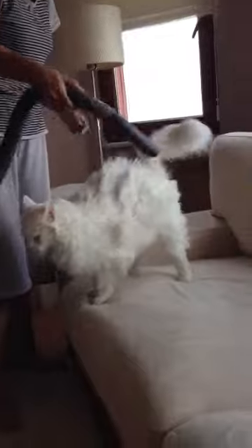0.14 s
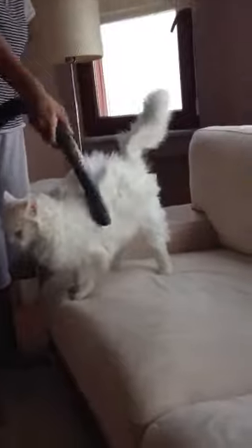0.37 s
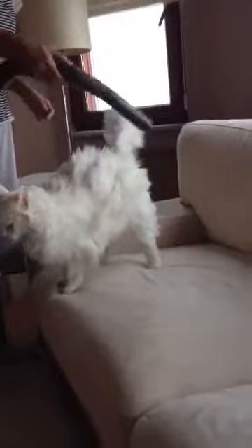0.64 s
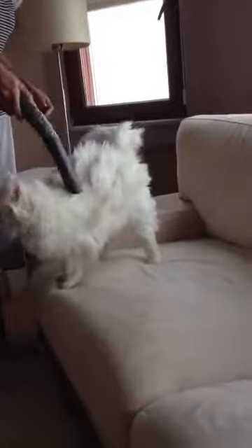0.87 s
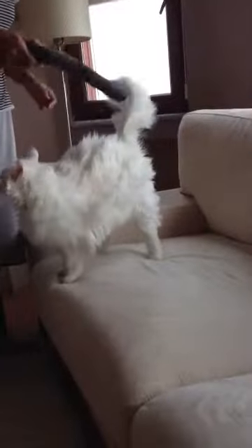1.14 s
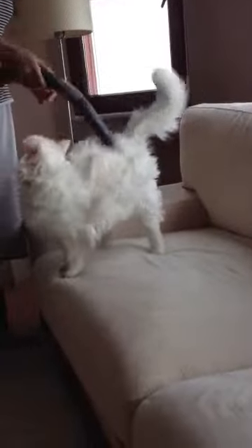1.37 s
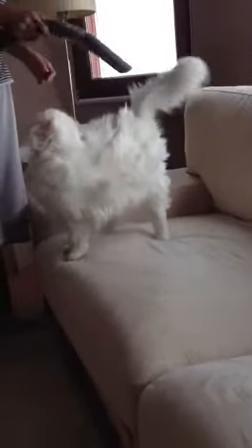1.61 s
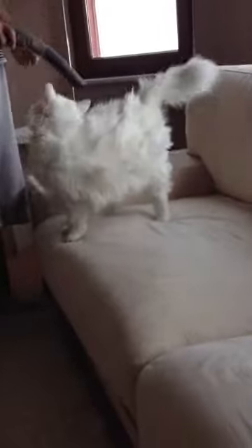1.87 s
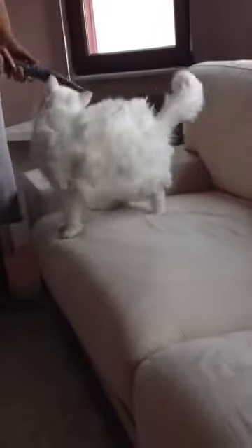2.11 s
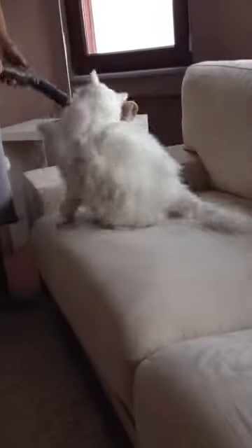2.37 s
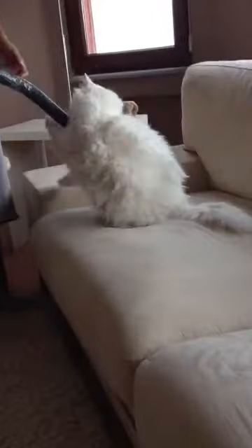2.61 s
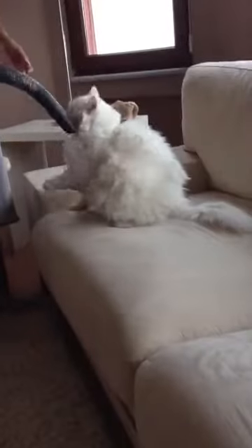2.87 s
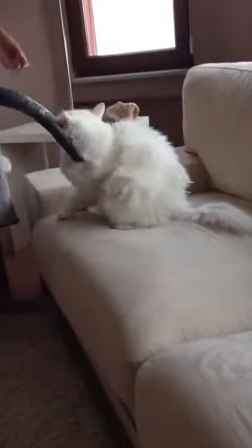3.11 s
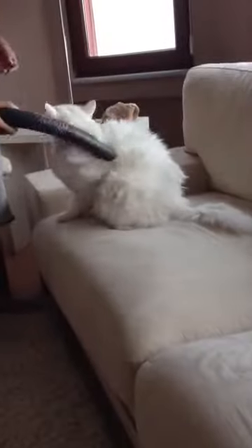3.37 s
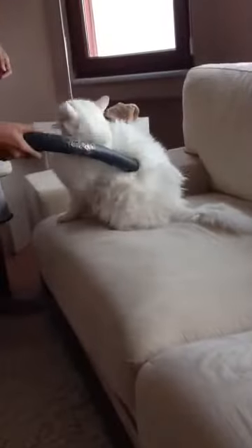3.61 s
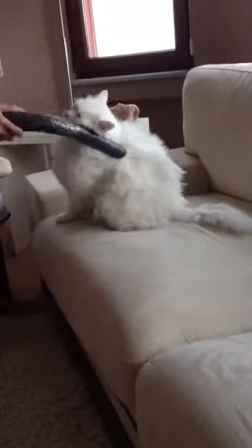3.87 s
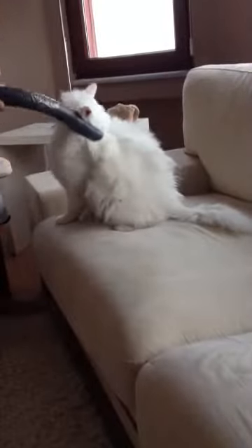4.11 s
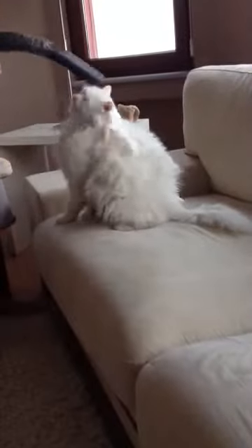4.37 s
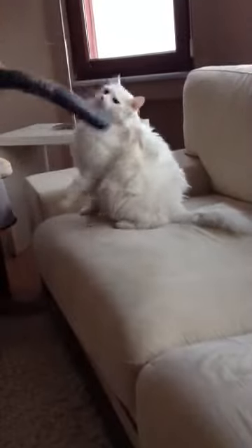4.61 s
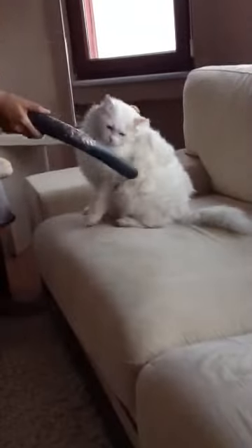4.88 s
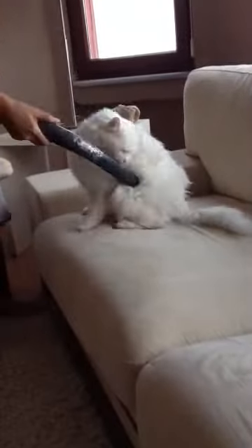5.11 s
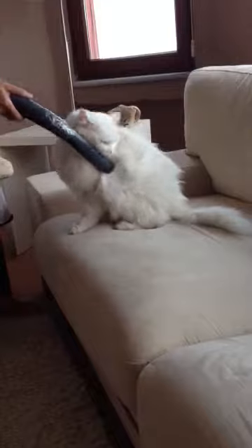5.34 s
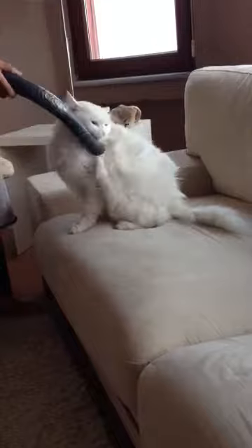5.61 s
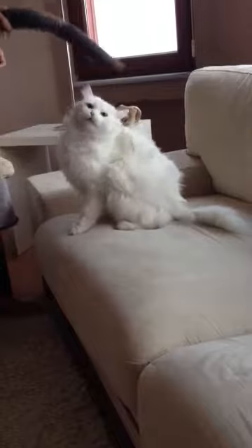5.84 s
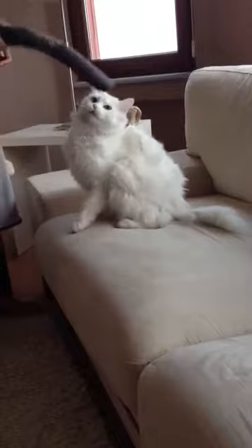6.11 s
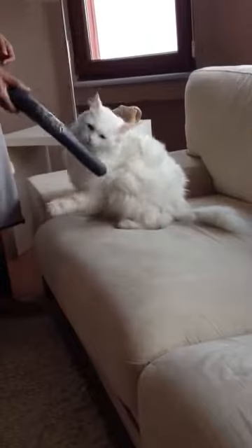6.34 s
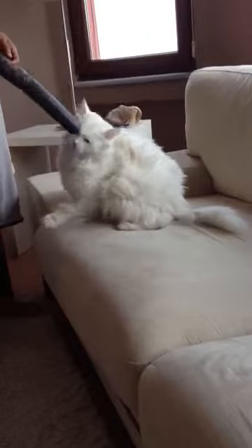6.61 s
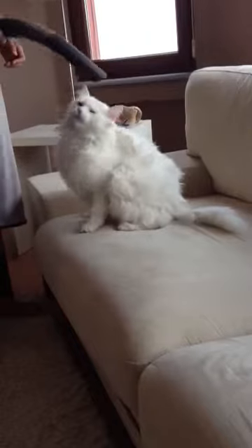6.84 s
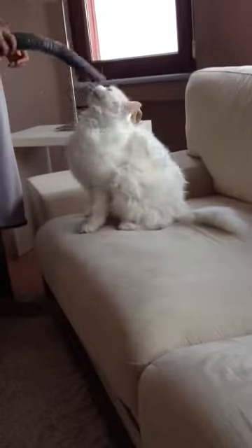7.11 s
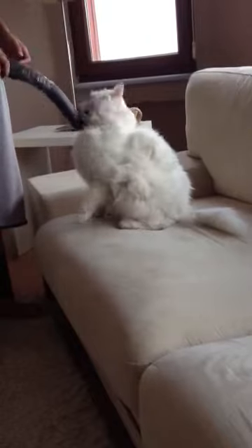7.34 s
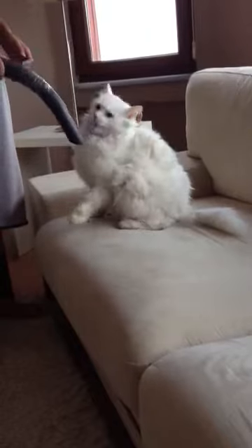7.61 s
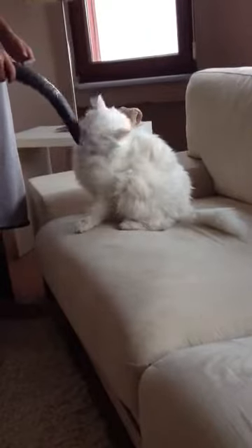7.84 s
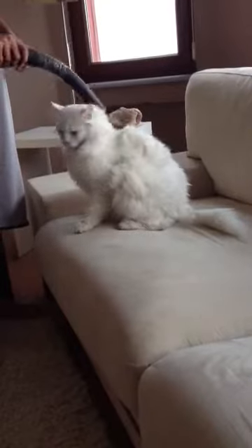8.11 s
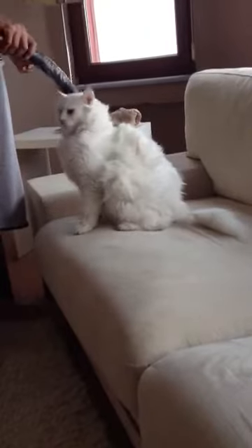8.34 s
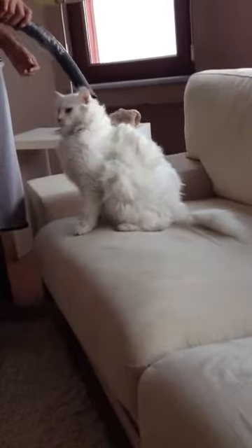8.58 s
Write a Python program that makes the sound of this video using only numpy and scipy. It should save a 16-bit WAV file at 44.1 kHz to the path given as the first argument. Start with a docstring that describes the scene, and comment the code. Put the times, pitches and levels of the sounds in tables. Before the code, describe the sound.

Constant rushing vacuum noise with a clean motor tone and piercing whine that climb and sink slightly, with brief fur flutters and soft thuds.

```python
"""A vacuum cleaner runs in a furnished living room while its hose is drawn over a cat's fur.
Throughout, the motor whines at its shaft speed and at the rate of nine fan blades, over rumbling, roaring, hissing air.
A thud comes at 0.5 s and fur flaps at 0.8 and 1 s; both pitches climb a little as fur chokes the nozzle.
They climb furthest from 3.6 to 4.4 s and from 5.2 to 5.8 s, with flaps at 3.9 and 5.7 s and thuds near 5.8 s.
The pitches then sink back, with a last thud at 7.7 s. One microphone, thin in the bass, hears it all."""
import sys
import numpy as np
from scipy import signal
from scipy.fft import rfft, irfft, next_fast_len
from scipy.io import wavfile
from scipy.ndimage import uniform_filter1d

SR = 44100
rng = np.random.default_rng(int(sys.argv[2]) if len(sys.argv) > 2 else 0)


def waveform_to_disk(signal):
    """Save audio, clipped to [-1, 1], as 16-bit WAV at the path in sys.argv[1]."""
    frames = np.transpose(np.atleast_2d(signal))
    scaled = np.clip(frames, -1, 1) * 32767
    samples = np.round(scaled).astype(np.int16)
    wavfile.write(sys.argv[1], SR, samples)


def attenuation_scalar(level_db):
    """Turn a level in dB into a linear amplitude multiplier (20 dB per decade)."""
    decades = np.asarray(level_db, float) / 20
    return 10 ** decades


N = 384552  # length in samples
FULL_CHOKE_HZ = 25  # rise in shaft speed that counts as a fully choked nozzle


def rms_one(x):
    """Scale to an rms (average strength) of one."""
    return x / np.sqrt(np.mean(x ** 2) + 1e-20)


def drift(rate_hz):
    """Slow chance: noise at every 40th sample, smoothed twice by a one-pole low-pass; spread 1."""
    pole = np.exp(-80 * np.pi * rate_hz / SR)
    noise = rng.standard_normal(N // 40 + 2002)
    slow = signal.lfilter([1], [1, -2 * pole, pole * pole], noise)[2000:]  # skip the filter's start
    return np.interp(np.arange(N) / 40, np.arange(len(slow)), rms_one(slow))


def turns(hz):
    """Phase in radians of a pitch curve."""
    return 2 * np.pi * np.cumsum(hz) / SR


def lag(x, seconds):
    """First-order sluggishness: the output closes in on the input at a steady rate per unit of gap."""
    pole = np.exp(-1 / (seconds * SR))
    return signal.lfilter([1 - pole], [1, -pole], x)


def spans(rows, heights):
    """Steps that hold a height from each start for its length."""
    t = np.arange(N) / SR
    return sum(height * ((t >= start) & (t < start + length))
               for (start, length, _), height in zip(rows, heights))


def half_sine_swell(t, start, length):
    """A rounded rise and fall, silent outside its length."""
    return np.sin(np.pi * np.clip((t - start) / length, 0, 1))


def reach(table, shaft_hz, choked):
    """Room paths add or cancel as the pitch slides: a tone's height, between its choked and open values."""
    hz, choked_db, open_db = np.transpose(table)
    choked_height = np.interp(shaft_hz, hz, attenuation_scalar(choked_db))
    open_height = np.interp(shaft_hz, hz, attenuation_scalar(open_db))
    return choked * choked_height + (1 - choked) * open_height


def choking(hose_lag_s=.035, rotor_lag_s=.415):
    """Fur chokes the nozzle and unloads the fan; the rotor's inertia rounds every change of speed."""
    # spells of choking: (start [s], length [s], rise the shaft would settle at [Hz])
    chokes = [(0, .08, 14), (.455, .11, 3), (.995, .06, 9.6), (1.405, .06, 11.9), (3.585, .36, 25.8),
              (3.985, .4, 25.8), (5.185, .6, 29.7), (6.925, 1.36, 1.5), (8.295, .6, 4.8)]
    unload_hz = lag(spans(chokes, np.array(chokes)[:, 2]), hose_lag_s)
    choked = np.clip(unload_hz / FULL_CHOKE_HZ, 0, 1)
    return choked, lag(unload_hz, rotor_lag_s)


def motor(shaft, shaft_hz, choked, waver_db=1.5, room_late_s=0.039, mains_ripple_hz=100):
    """Rotor unbalance as a clean tone, with weak mains tones and side tones."""
    # magnetic pull at twice mains, alone and beating with the shaft, and a shaft overtone:
    # (shaft multiple, ripple multiple, level [dB rms])
    motor_tones = [(0, 1, -63.5), (0, 2, -57), (0, 3, -57), (1, -1, -62), (1, 2, -63), (2, -1, -66),
                   (2, 0, -63), (2, 1, -61), (2, 2, -64)]
    # height of the shaft tone: (shaft speed [Hz], nozzle choked [dB rms], nozzle open [dB rms])
    shaft_reach = [(564.7, -37, -36), (566, -34.5, -36.5), (567.5, -36, -37), (569.9, -40.5, -41),
                   (569.5, -40, -44), (575, -37.5, -41), (575.5, -34, -41.7), (577.4, -36, -37.5),
                   (583.3, -39, -39.5), (584, -40.5, -42), (585, -44, -44.5), (585.2, -52, -52),
                   (586.4, -53, -58)]
    ripple = turns(np.full(N, mains_ripple_hz))
    # the room answers late, so its effect follows an earlier speed
    late_hz = np.interp(np.arange(N) - room_late_s * SR, np.arange(N), shaft_hz)
    out = reach(shaft_reach, late_hz, choked) * attenuation_scalar(0.33 * drift(31)) * np.sin(shaft)
    for order, beat, db in motor_tones:
        phase = round(order) * shaft + round(beat) * ripple + rng.uniform(0, 2 * np.pi)
        out += attenuation_scalar(db + waver_db * drift(1.8)) * np.sin(phase)
    return np.sqrt(2) * out


def fan_whine(shaft, shaft_hz, choked, blades=9, flutter_db=1.9, swell_edge_s=.025):
    """Blades passing the vanes: one high tone, swelling and cutting out."""
    # height of the whine: (shaft speed [Hz], nozzle choked [dB rms], nozzle open [dB rms])
    whine_reach = [(564.4, -53, -51), (566, -54, -59), (568, -55, -60), (569, -50, -53), (570, -51, -53),
                   (571, -58, -62), (572, -48, -42), (573, -42, -46), (574, -42, -60), (575, -38, -44),
                   (576, -37.5, -41), (577, -38, -40), (578, -49, -42), (579, -51, -43), (580, -62, -43),
                   (581, -60, -50), (582, -43, -62), (583, -44, -50), (584, -54, -43), (585, -49, -56),
                   (586, -39, -43), (587, -36.5, -36.5)]
    # the whine also comes forward now and then: (start [s], length [s], lowest height [dB rms])
    whine_swells = [(0, .17, -46), (.29, 0.51, -46), (1.43, .13, -49), (1.85, .2, -49), (3.79, 0.17, -38),
                    (4.153, .12, -40.5), (4.432, 0.039, -35.5), (4.925, .04, -46), (5.3, 0.033, -36),
                    (6, .14, -40), (6.225, .07, -39.5), (6.4, .11, -45), (6.58, .08, -47),
                    (6.78, 0.24, -47), (7.78, .25, -50), (8.03, .24, -46), (8.38, .16, -46),
                    (8.59, .15, -47)]
    steps = spans(whine_swells, attenuation_scalar(np.array(whine_swells)[:, 2]))
    swells = uniform_filter1d(steps, size=int(swell_edge_s * SR))
    height = np.maximum(reach(whine_reach, shaft_hz, choked), swells)
    return np.sqrt(2) * height * attenuation_scalar(flutter_db * drift(30.0)) * np.sin(blades * shaft)


def air(overspeed, patchy_db=0.6, wander_db=0.57, gust_db=0.43):
    """Turbulence coloured by the ducts; each region follows the flow in its own way and flickers a little."""
    # hose rumble, casing roar, nozzle rush, exhaust rush, hiss:
    # (level [dB rms], change at full overspeed [dB], share of the brightness swing [factor])
    air_regions = [(-45.5, -1, 0.41), (-45.5, 0.8, -0.74), (-45, 0.3, -0.86), (-41.5, -1.8, 0.5),
                   (-41.5, -0.8, 0.66)]
    # where one kind of air noise gives way to the next: [Hz]
    region_edges = [520, 1850, 3050, 5200]
    # broad colour of the air noise: (frequency [Hz], relative level per Hz [dB])
    colour = [(30, -38), (85, -28), (120, -16), (230, -3), (440, -10), (1900, -10.3), (2100, -6),
              (3100, -9.5), (4200, -7), (5500, -8), (8500, -12.5), (10300, -12.5), (10620, -17),
              (10720, -28), (11150, -37)]
    # hose, casing and room resonances: (centre [Hz], width [Hz], rise [dB])
    resonances = [(167, 43, 8), (262, 20, 7), (374, 70, 6), (487, 20, 6), (892, 25, 3), (974, 63, 5),
                  (1118, 40, 4.5), (1236, 74, 5), (1483, 34, 4), (1604, 58, 4.5), (1861, 38, 5),
                  (2021, 30, 4.5), (2155, 20, 2.5), (2289, 25, 2), (2594, 25, 4), (2762, 239, 4),
                  (3236, 138, 3.5), (3542, 167, 4), (4114, 209, 6.5), (4321, 15, 4), (4411, 116, 3),
                  (5945, 198, 2), (6879, 119, 3.5), (7275, 600, 2.5), (8020, 360, 2.5), (9495, 250, 3)]
    # the rush leans brighter or duller as the hose moves: (time [s], swing before each region's share [dB])
    brightness = [(0, -.5), (.6, 0.6), (1.2, 0), (2, 1.3), (3, 0.5), (3.6, 1.1), (5, -0.5), (6.1, 0.5),
                  (7.5, -1), (8.1, 0), (8.72, 0.5)]
    size = 2 * next_fast_len(N // 2 + 1)
    hz = np.arange(size // 2 + 1) * SR / size + 1e-3
    colour_hz, colour_db = np.transpose(colour)
    db = np.interp(np.log(hz), np.log(colour_hz), colour_db)
    for centre_hz, width_hz, rise_db in resonances:
        db += rise_db / (1 + (2 * (hz - centre_hz) / width_hz) ** 2)
    coloured = rfft(rng.standard_normal(size)) * attenuation_scalar(db) * room(hz)
    # neighbouring regions cross over smoothly and add up to one
    above = [1 / (1 + (edge / hz) ** 16) for edge in region_edges]
    shares = -np.diff([np.ones_like(hz), *above, np.zeros_like(hz)], axis=0)
    bright_s, swing_db = np.transpose(brightness)
    bright_db = np.interp(np.arange(N) / SR, bright_s, swing_db)
    gust, out = drift(23.0), 0
    for share, (mean_db, choke_db, leans) in zip(shares, air_regions):
        level_db = mean_db + choke_db * overspeed + leans * bright_db + wander_db * drift(1.53)
        level_db = level_db + gust_db * gust + patchy_db * drift(7.5)
        out = out + attenuation_scalar(level_db) * rms_one(irfft(coloured * share, size)[:N])
    return out


def room(hz, t60_s=0.28, tail_db=-10.5, dull_hz=4000):
    """Direct sound plus a fading tail, dulled by soft furniture: fine fixed ripples in the spectrum."""
    t = np.arange(SR // 2) / SR
    tail = rng.standard_normal(len(t)) * attenuation_scalar(-60 * t / t60_s)
    dull = 1 / np.sqrt(1 + (hz / dull_hz) ** 2)
    return 1 + attenuation_scalar(tail_db) * dull * rfft(tail / np.sqrt(np.sum(tail ** 2)), 2 * (len(hz) - 1))


def uneven_bands(x, size=2048, count=3, spread_db=2.2):
    """Coarse grain: each narrow band, count bins wide, has its own gain, wandering within 0.1 s."""
    cells = signal.stft(x, nperseg=size)[2]
    chance = rng.standard_normal((len(cells) // count + 1, cells.shape[1]))
    gains = attenuation_scalar(spread_db * rms_one(uniform_filter1d(chance, size=3)))
    gains = np.repeat(gains, count, axis=0)[:len(cells)]
    uneven = signal.istft(cells * gains, nperseg=size)[1][:N]
    return rms_one(uneven) * np.std(x)  # overall level kept


def fur_flutters(unsteady=.05):
    """A tuft flaps across the opening: a brief, unsteady buzz coloured by the hose end."""
    # fur flapping, before the bass cut:
    # (start [s], overtone level [dB], flap rate [Hz], length [s], strongest near [Hz])
    flaps = [(.78, -42, 235, .13, 240), (1.02, -42, 232, .1, 330), (3.86, -44, 195, .1, 300),
             (5.68, -41, 200, .085, 330), (5.79, -44, 190, .07, 420)]
    t, out = np.arange(N) / SR, np.zeros(N)
    for start, db, hz, length, peak_hz in flaps:
        swell = half_sine_swell(t, start, length)
        flap = turns(hz * (1 + unsteady * drift(15.0)))
        for k in range(1, 9):
            hose_end = 1 / np.sqrt(1 + ((k * hz - peak_hz) / 150) ** 2)
            out += attenuation_scalar(db) * swell * np.sin(k * flap + k * k) * hose_end  # k * k spreads the phases
    return out


def bumps():
    """Short soft thuds: a few cycles under a rounded swell; parts that overlap make one thud."""
    # parts of the dull bumps, before the bass cut: (start [s], peak level [dB], pitch [Hz], length [s])
    thud_parts = [(.505, -35.5, 138, .055), (5.755, -39, 200, .02), (5.766, -34, 590, .02),
                  (5.78, -37, 920, .012), (5.82, -36, 215, .025), (7.745, -32.5, 135, .028),
                  (7.746, -30, 240, .025), (7.758, -36, 520, .006)]
    t, out = np.arange(N) / SR, np.zeros(N)
    for start, db, hz, length in thud_parts:
        out += attenuation_scalar(db) * half_sine_swell(t, start, length) * np.sin(2 * np.pi * hz * (t - start))
    return out


def deep_rumble(level_db=-82, cut_hz=55):
    """Faint lumpy air movement at the microphone: low-passed noise of drifting level."""
    low_pass = signal.butter(2, cut_hz, fs=SR, output="sos")
    low = signal.sosfilt(low_pass, rng.standard_normal(N))
    return attenuation_scalar(level_db + 4 * drift(6)) * rms_one(low)


def scene(idle_hz=564.375):
    """One microphone feeds both channels; it passes little of the thuds' deepest part."""
    choked, rise_hz = choking()
    shaft_hz = idle_hz + rise_hz
    shaft = turns(shaft_hz)
    tones = motor(shaft, shaft_hz, choked) + fan_whine(shaft, shaft_hz, choked)
    rush = uneven_bands(air(rise_hz / FULL_CHOKE_HZ))
    bass_cut = signal.butter(2, 90, "high", fs=SR, output="sos")
    thuds = signal.sosfilt(bass_cut, bumps() + fur_flutters())
    return np.tile(tones + rush + thuds + deep_rumble(), (2, 1))


def band_limit(x):
    """A steep low-pass at the top of the band."""
    return signal.sosfilt(signal.butter(12, 11560, fs=SR, output="sos"), x)


def record(dry):
    """A steep low-pass takes away the top of the treble."""
    top_cut = signal.ellip(12, .5, 60, 11150, fs=SR, output="sos")  # ripple dB, depth dB, edge Hz
    mix = signal.sosfilt(top_cut, dry)
    return band_limit(mix)


dry = scene()
out = record(dry)
waveform_to_disk(out)
```